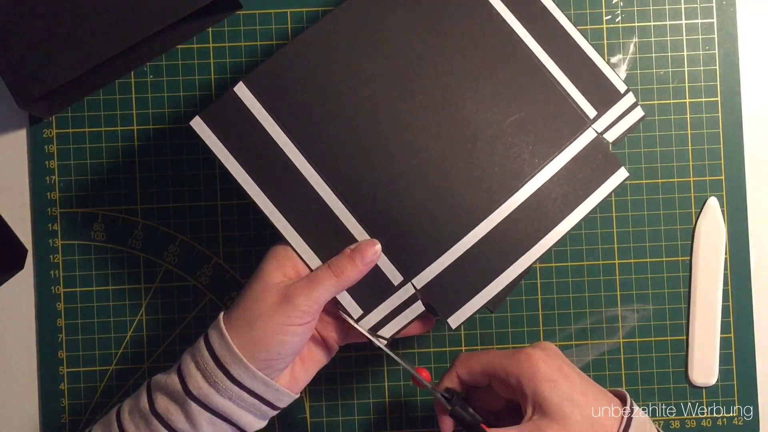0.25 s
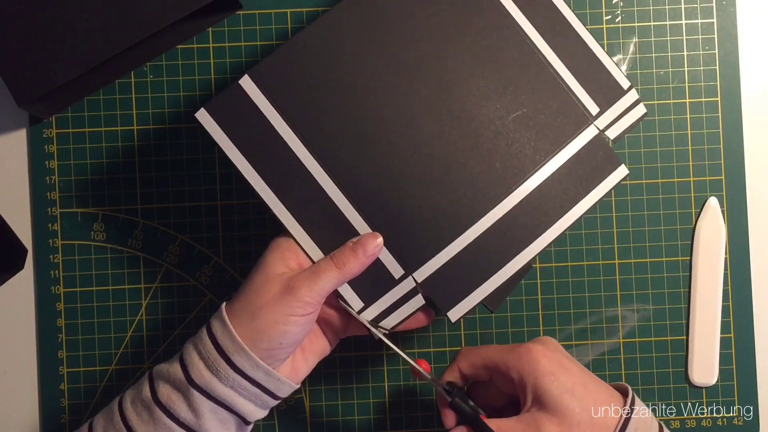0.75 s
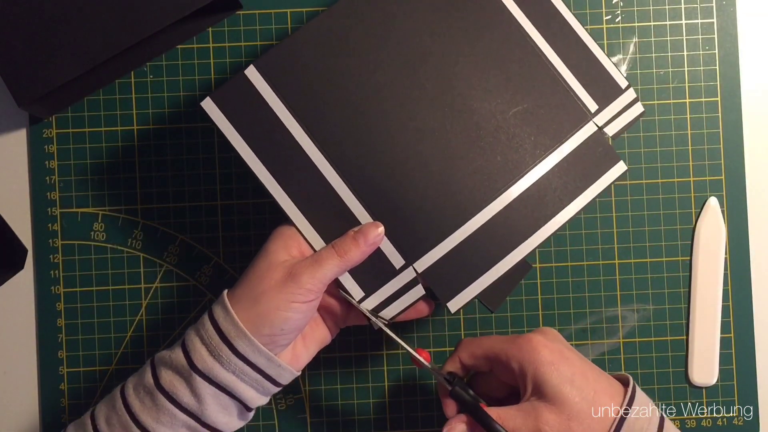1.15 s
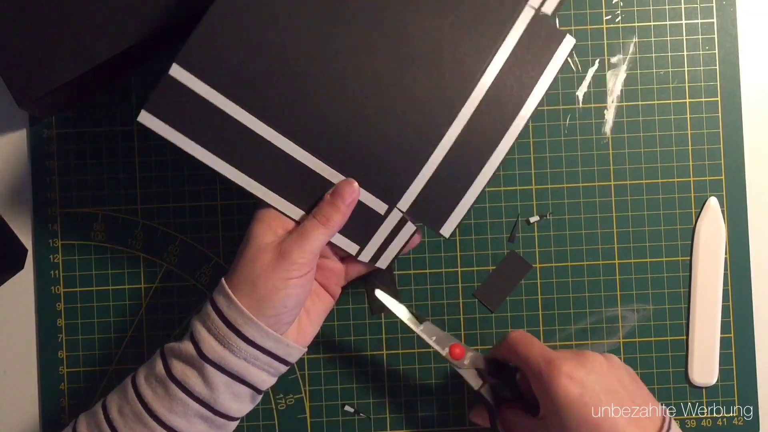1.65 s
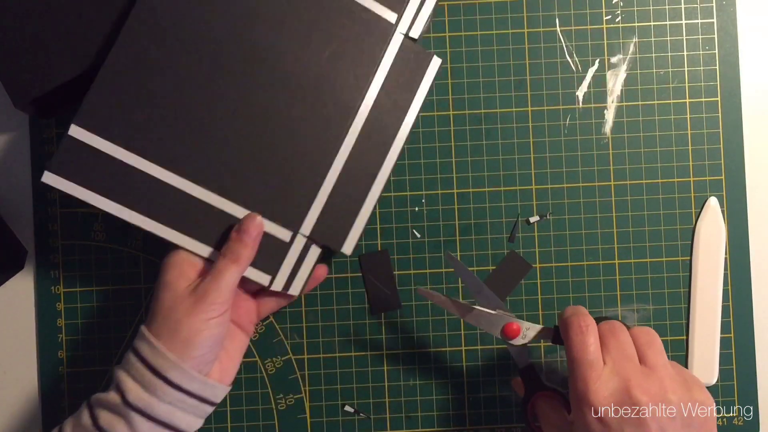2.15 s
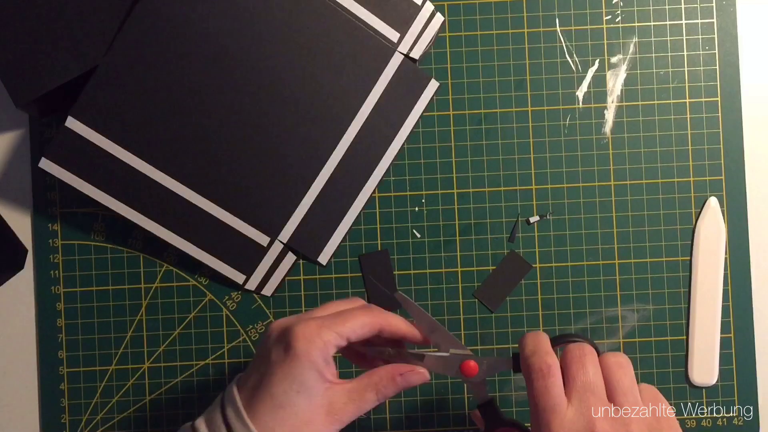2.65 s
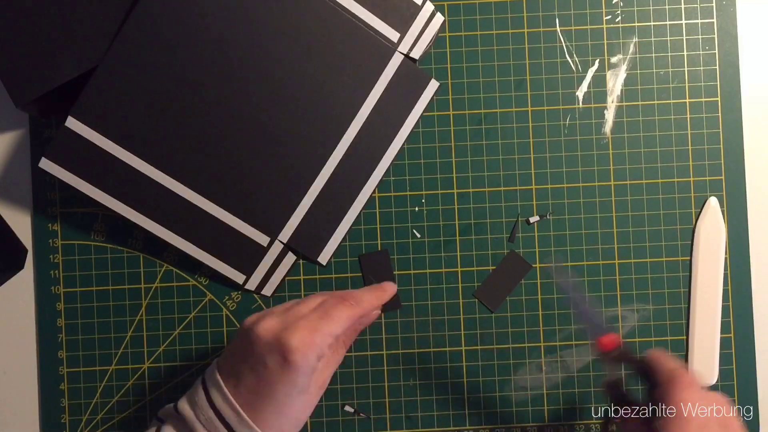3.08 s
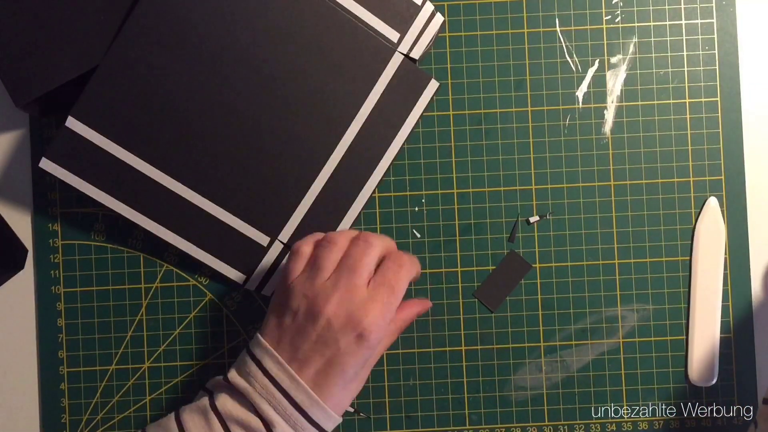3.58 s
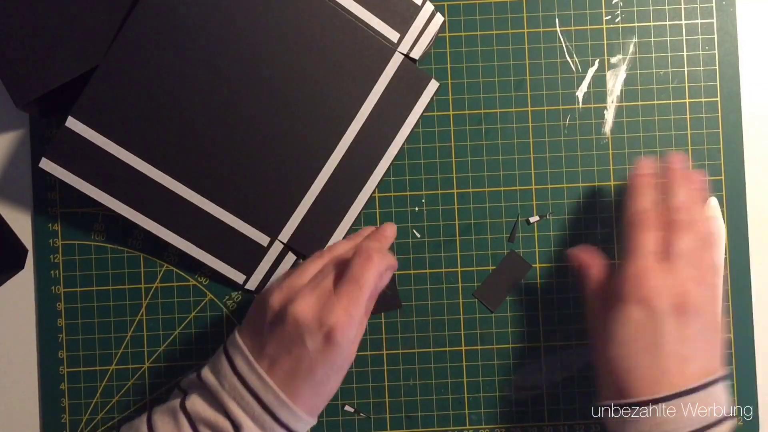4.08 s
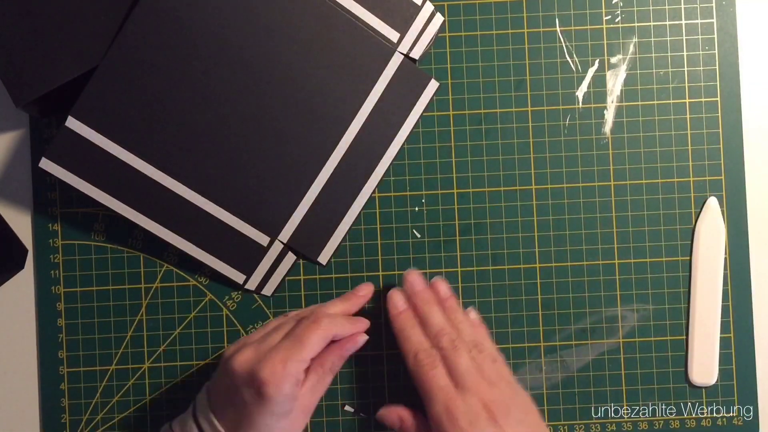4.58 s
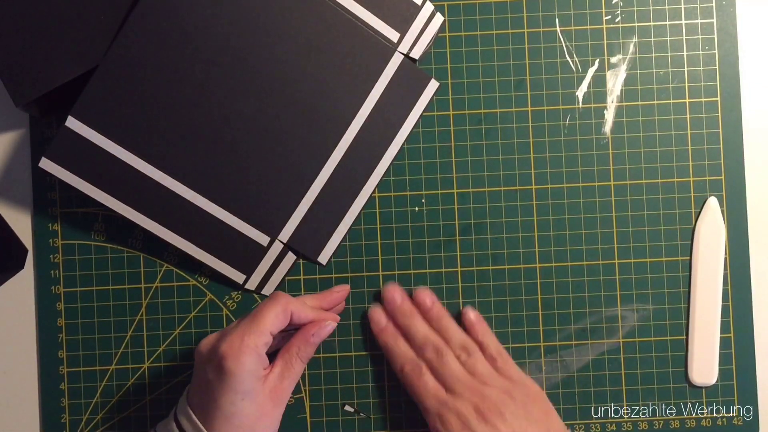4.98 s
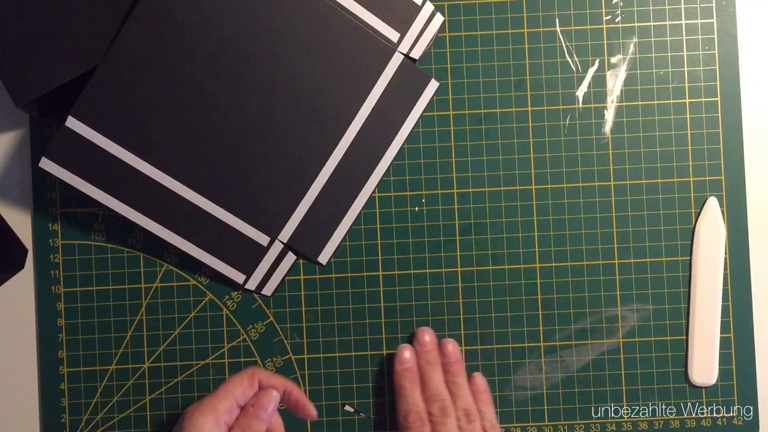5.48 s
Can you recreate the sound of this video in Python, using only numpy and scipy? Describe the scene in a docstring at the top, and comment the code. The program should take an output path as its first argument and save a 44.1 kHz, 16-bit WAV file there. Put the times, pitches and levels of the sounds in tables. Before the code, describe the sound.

Small scissors crunch and snap through stiff card, the card flops onto a mat, scissors clatter down, then hands thump and sweep scraps.

```python
"""Stiff card crunches twice under small scissors, which snap shut; the card drops on a cutting mat.
The blades close once more, the scissors clatter onto the table, hands thump and sweep the scraps away.
Cuts, blows and rubs are shaped bursts of noise; thumps are ringing modes of the table top.
A small room answers: desk reflections for small sounds under the microphone, the whole room for knocks.
Air noise and mains hum lie beneath."""
import sys
import numpy as np
from scipy import signal
from scipy.fft import rfft, irfft
from scipy.io import wavfile
from scipy.ndimage import uniform_filter1d

SR = 44100
rng = np.random.default_rng(int(sys.argv[2]) if len(sys.argv) > 2 else 0)


def to_wav(sig):
    """Store sig (one row per channel, or 1-D mono) as 16-bit WAV at the path in sys.argv[1].

    Samples outside -1..1 are clipped; the rate is SR.
    """
    pcm = np.clip(np.atleast_2d(sig), -1, 1) * 32767
    pcm = np.round(pcm).astype(np.int16)
    wavfile.write(sys.argv[1], SR, pcm.T)  # frames by channels


N = 252693
BURST = 8192  # samples in one short sound
T, HZ = np.arange(BURST) / SR, np.fft.rfftfreq(BURST, 1 / SR)
TIME, ALL_HZ = np.arange(N) / SR, np.fft.rfftfreq(N, 1 / SR)

# Levels of bites, blows and narrow-band touches are the rms of their loudest 3 ms, direct sound
# ahead of the recorder.
# The squeezes: each crunches through fibres until the card gives way.
# Each row: moment it gives in seconds, level in dB, half length in seconds, build-up in seconds.
BITES = [(.294, -56, 0.0033, 0.015), (.433, -62.5, .006, .05), (.468, -57.5, .006, .003),
         (.517, -49.5, .0036, 0.041), (0.598, -50.5, .0045, .004), (.629, -44.5, 0.0028, 0.019),
         (.71, -32.5, 0.0019, 0.0068), (0.729, -48, 0.0078, .003), (1.009, -47.5, 0.0075, .006),
         (1.172, -52, .005, 0.034), (1.314, -44.5, .0023, 0.014), (1.35, -30.5, 0.0041, 0.007)]
# How the held card rings in each cut. Each row: frequency in Hz, gain in dB.
FIRST_CUT_RING = [(200, -31), (520, -18.5), (720, -3.5), (900, 3.5), (1060, 1), (1300, -9), (1600, -28),
                  (1950, -10.5), (2350, -13), (2750, 8), (3250, -8.5), (3700, -16), (7000, -25.5),
                  (16000, -25)]
SECOND_CUT_RING = [(200, -18), (750, -20), (1050, 6.5), (1200, -1), (1400, 7.5), (1750, -11.5), (2400, -35),
                   (3100, -10), (3900, -23.5), (6000, -23), (8000, -44), (16000, -36)]
REGRIP_S = 0.9  # the card is gripped anew
GRIP_BEFORE, GRIP_AFTER = 0.16, 0.72  # share of the second ring before and after that
CRUNCH_DB, CRUNCH_ROUGH_DB = -3, 2  # the build-up: level re the bite, and how unevenly it swells
SLIP_S, SLIP_JITTER, STICK_DB = 0.01515, 0.16, -10.5  # slip interval, share its pace varies, level between slips

# Blows of six kinds, each with its spectrum: blades snapping through the last of the card,
# steel touching steel, blades landing on the table, handles dropping and the scissors' parts
# clacking together, light taps and flicks of card, fingers and hands, and card falling flat
# and settling on the mat.
# Each blow row: start in seconds, level in dB, contact in seconds, brightness in dB per octave.
# Each spectrum row: frequency in Hz, gain in dB.
SNAPS = [(.7092, -33, 0.0012, 0), (1.3567, -27, 0.0036, -1), (1.3595, -33, 0.0019, 2.5)]
SNAP_COLOUR = [(40, -40), (150, -48), (400, -0.5), (600, 1), (1050, 4), (1450, -10.5), (2300, -4.5),
               (2850, 0), (3400, -7.5), (5000, -16.5), (6200, -13), (8500, -26.5), (10500, -15),
               (16000, -31)]
BLADE_CLICKS = [(1.466, -63, 0.007, -2), (1.6022, -59.5, 0.0029, -5), (2.843, -62, 0.0062, 19),
                (3.035, -58, 0.0024, 3), (3.2247, -29.5, 0.0026, -4), (4.648, -63, .004, 36),
                (5.335, -69.5, 0.0021, 8)]
BLADE_COLOUR = [(300, -55), (850, -26), (1150, -0.5), (1700, -8.5), (2400, -11.5), (3500, -3), (4600, 6),
                (6200, -0.5), (9000, 6.5), (14000, 3), (16000, -7)]
STEEL_KNOCKS = [(3.8237, -20.5, 0.0038, -1)]
STEEL_COLOUR = [(40, -30), (110, -12), (500, -12), (720, -1), (980, -4), (1170, -12), (1400, 1), (1780, -2),
                (2100, -22), (2550, 0), (2850, -2), (3150, -15), (3700, -10), (4050, 1), (4400, -4),
                (4850, -22), (5700, -12), (9000, -21), (16000, -31)]
SCISSOR_CLACKS = [(3.957, -44.5, 0.016, -1), (3.9765, -16.5, 0.004, -1), (3.995, -23, 0.0058, -2.5),
                  (4.004, -26, 0.0088, -3), (4.0097, -33, .0033, 6), (4.0298, -24.5, 0.0029, 7.5)]
CLACK_COLOUR = [(40, -36), (110, -11.5), (250, -10.5), (400, -4.5), (600, 1.5), (1050, -1.5), (1450, -6),
                (1900, -12.5), (3000, -16.5), (4000, -26.5), (6000, -32.5), (9000, -45), (16000, -53.5)]
LIGHT_TAPS = [(1.464, -51.5, 0.008, -3.5), (1.526, -46.5, .0039, 3.5), (1.788, -57, 0.0057, -4),
              (1.8094, -43.5, 0.0034, -3.5), (1.823, -52, 0.0018, -5.5), (2.2145, -56.5, 0.041, -3.5),
              (3.505, -58, 0.013, 7), (3.5375, -52, .003, -1.5), (5.4262, -62.5, 0.0041, -4.5)]
LIGHT_TAP_COLOUR = [(40, -31.5), (320, -12.5), (600, -17), (1050, -4), (1450, 1.5), (1750, -9.5),
                    (2300, -12), (2950, -5.5), (3500, -10), (4000, -6), (5000, -21.5), (7000, -22.5),
                    (10000, -41), (16000, -48)]
CARD_TAPS = [(2.2563, -28.5, 0.0017, 1.5), (2.263, -37, 0.012, 1.5), (2.3452, -39, 0.0027, 4),
             (2.356, -41, 0.01, -4), (2.4727, -36, 0.005, 0.5), (2.4927, -36, 0.0068, 0.5)]
CARD_COLOUR = [(40, -43), (100, -22), (250, 2.5), (550, 4), (900, 1), (1090, -3), (1270, 3.5), (1650, -8),
               (1950, -6), (2400, -14.5), (3100, -16.5), (4200, -24), (6500, -32.5), (9000, -43),
               (16000, -48)]
MIN_CONTACT_S = 1e-4  # any shorter contact in a row counts as this
# What rings on after a blow. Each row: frequency in Hz, level re the blow in dB, t60 in seconds.
CARD_MODES = [(558, -10, 0.086), (1080, -6, 0.082), (1676, -5.5, 0.028)]
STEEL_MODES = [(725, -3, 0.039), (1370, -4, 0.016), (1565, -15, 0.028), (2685, -5, 0.035),
               (4245, -26, 0.023)]
# Flurries of small contacts. Each lists: start in seconds, length in seconds, first level in dB,
# change by the end in dB, contact in seconds, brightness in dB per octave.
CARD_TURNING = (1.895, 0.045, -56, 2, -0.05, -2.5)
CARD_SETTLING = (2.5, 0, -44, -1, -0.12, 3.5)
SCISSOR_RATTLE = (4.04, 0.035, -36, 0, .003, 2.5)
FLURRY_SPREAD_DB, FLURRY_SPREAD_TILT = 2.4, 1.5  # scatter of level (dB) and brightness (dB per octave)

# Rubbing strokes of steel on steel, card scuffing, and palms on the mat, each with its spectrum.
# Each stroke row: time of full pressure in seconds, level in dB, rise, hold and fall in seconds.
# Each spectrum row: frequency in Hz, gain in dB.
BLADE_SLIDES = [(1.906, -69.5, .018, .015, .03), (1.976, -58, .014, .008, 0.005), (3.0, -75, .03, .04, .03),
                (3.173, -56, .003, .002, .005), (3.194, -46.5, .009, .012, 0.01),
                (3.29, -61.5, .03, 0.009, .008)]  # levels before a trim in scene()
SLIDE_COLOUR = [(1000, -28), (3500, -14.5), (5500, -15.5), (6700, -8.5), (8200, -14), (10000, -8),
                (12800, -4.5), (16000, -13)]
CARD_SLIDES = [(1.372, -55, 0.0035, .015, 0.083), (1.895, -66, .03, 0.024, 0.13),
               (2.38, -50.5, .025, .025, 0.038), (3.54, -62, .035, .028, 0.011)]
SCUFF_COLOUR = [(200, 0.5), (600, 1), (1300, -1), (2200, -1), (3200, -6.5), (4300, -8), (6000, -18),
                (10000, -27), (16000, -30)]
SWEEPS = [(4.32, -69, 0.028, 0.068, .04), (4.455, -60.5, 0.049, 0.13, .085),
          (4.98, -58.5, .035, 0.018, .04), (5.1, -61, 0.044, .1, .025), (5.47, -65, 0.02, 0.31, .05),
          (5.6, -62, 0.018, 0.0089, .012)]
SWEEP_COLOUR = [(300, -1.5), (800, -2), (1600, 5), (2400, 3), (3300, 3.5), (4800, -1), (7000, 0), (9500, 0),
                (13000, -2), (16000, -7)]
# Brief narrow-band squeaks, finger taps and hand touches.
# Each row: centre in seconds, level in dB, half length in seconds, frequency in Hz, width in Hz.
SQUEAKS_AND_TOUCHES = [(1.855, -58.5, 0.017, 1650, 220), (2.078, -63, 0.065, 1660, 192),
                       (2.223, -53, 0.0073, 580, 110), (3.512, -49, 0.0037, 273, 91),
                       (4.975, -58.5, 0.026, 3140, 590), (5.195, -50.5, 0.0069, 3130, 450),
                       (5.601, -57, .008, 3600, 790), (5.723, -58.5, 0.02, 1980, 487)]

# Card and hands landing softly on the table. Each row: start in seconds, peak in dB, push in seconds.
THUMPS = [(2.257, -42, 0.0042), (2.299, -38.5, .003), (2.346, -34, 0.0015), (2.362, -35, 0.0019),
          (2.497, -44, .0041), (3.545, -45.5, 0.012), (4.297, -29.5, 0.0041), (4.906, -37.5, .0044),
          (5.429, -34.5, 0.0091)]
# The table top. Each row: frequency in Hz, level in dB, t60 in seconds.
TABLE_MODES = [(67.6, -13, 0.18), (105, -11, 0.099), (117.4, 7.5, 0.11), (211, -13.5, .12),
               (300, -12.5, 0.15)]
# Each knock of the scissors also pushes the table: peak re the knock, and length of the push.
STEEL_WEIGHT_DB, CLACK_WEIGHT_DB, KNOCK_PUSH_S = -19.5, -13, 0.0022

# Decay of the reflections close around the desk, and of the room. Each row: frequency in Hz, t60 in seconds.
DESK_T60 = [(150, 0.33), (1200, 0.31), (3000, 0.28), (8000, 0.34), (15000, 0.26)]
ROOM_T60 = [(120, 0.95), (500, 0.55), (1500, 0.68), (4000, 0.62), (8000, 0.43), (15000, 0.3)]
# Spectrum of the air noise. Each row: frequency in Hz, gain in dB.
AIR = [(20, -9), (40, -2), (62, 6), (90, 8.5), (150, -3), (220, -3.5), (330, -5), (500, -10.5),
       (900, -12.5), (1500, -13.5), (2400, -14), (4000, -16.5), (7000, -21), (10500, -24), (16000, -26)]
AIR_DB = -71.5  # rms above 300 Hz
HUM_HZ, HUM_DB = 100, -59
LOW_CUT_HZ, EDGE_HZ = 58, 16200  # microphone low cut, recorder band limit


def amp(db):
    """Decibels to gain."""
    return 10 ** (np.asarray(db) / 20)


def unit(x):
    """Scales to rms 1."""
    return x / np.sqrt(np.mean(x ** 2) + 1e-20)


def crest(x, size=130):
    """Scales so that the loudest three milliseconds have rms 1."""
    return x / np.sqrt(uniform_filter1d(x ** 2, size).max() + 1e-20)


def read(points, hz):
    """Reads a spectrum table on a log-frequency axis."""
    f, value = np.transpose(points)
    return np.interp(np.log(hz + 1), np.log(f + 1), value)


def add(mix, s, sound):
    """Mixes a sound in at a time."""
    part = mix[max(round(s * SR), 0):][:len(sound)]
    part += sound[:len(part)]


def wander(rate_hz):
    """Slow random motion of rms 1."""
    noise = rfft(rng.standard_normal(N))
    return unit(irfft(noise * np.exp(-(ALL_HZ / rate_hz) ** 2), N))


def decaying_modes(modes, t):
    """Sum of sine modes, each dying away by 60 dB in its t60."""
    return sum(amp(db - 60 * t / t60) * np.sin(2 * np.pi * hz * t) for hz, db, t60 in modes)


def ring(force, colour_db, size=61):
    """Evens out a burst of force and passes it through a causal body of the given colour."""
    spectrum = rfft(force)
    own_log = np.log(uniform_filter1d(abs(spectrum) ** 2, size) + 1e-12) / 2
    log_gain = np.log(amp(colour_db)) - own_log
    circle = np.concatenate([log_gain, log_gain[-2:0:-1]])
    # minimum phase: the body starts to sound with the force, not before
    body = np.exp(np.conj(signal.hilbert(circle)))[:len(spectrum)]
    return crest(irfft(spectrum * body))


def cutting(grain_db):
    """The blades stick and slip ever harder, then break one dense clump of fibres; the card radiates it."""
    out = np.zeros(N)
    t = T - T[-1] / 2  # zero where the card gives
    pace = wander(60)
    swell = amp(CRUNCH_DB + CRUNCH_ROUGH_DB * wander(60))
    first_ring, second_ring = read(FIRST_CUT_RING, HZ), read(SECOND_CUT_RING, HZ)
    for s, db, half, build in BITES:
        noise, sizes = rng.standard_normal((2, BURST))
        slips = np.cumsum(1 + SLIP_JITTER * np.interp(s + t, TIME, pace)) / (SR * SLIP_S)
        stutter = amp(STICK_DB * np.sin(np.pi * (slips - slips[BURST // 2])) ** 2)
        crunch = stutter * np.interp(s + t, TIME, swell) * np.exp(-abs(t) / build) * (t < 0)
        give = np.exp(-0.5 * (t / half) ** 2)
        force = noise * amp(grain_db * sizes) * np.maximum(crunch, give)
        grip = GRIP_BEFORE if s < REGRIP_S else GRIP_AFTER
        add(out, s + t[0], amp(db) * ring(force, (1 - grip) * first_ring + grip * second_ring))
    return out


def strikes(rows, colour, tick, hold, grain_db, modes=()):
    """Each blow is a sharp first touch and a cluster of uneven tiny contacts; a few modes ring on."""
    out = np.zeros(N)
    octaves = np.log2(np.maximum(HZ, 200) / 1000)  # brightness pivots at 1 kHz
    tones = decaying_modes(modes, T)
    for s, db, contact, bright in rows:
        noise, sizes = rng.standard_normal((2, BURST))
        contact = max(contact, MIN_CONTACT_S)
        force = unit(noise * amp(grain_db * sizes)) * np.exp(-(T / contact) ** hold)
        force[0] = tick
        blow = ring(force, read(colour, HZ) + bright * octaves)
        swell = 1 - np.exp(-2 * T / contact)  # the modes swell during contact
        add(out, s, amp(db) * crest(blow + tones * swell))
    return out


def flurry(start, length, db, change_db, contact, bright, count):
    """Rows for small, differing blows spread unevenly over the length, or all at once if it is zero."""
    late = (np.arange(count) + rng.random(count)) / count
    rows = []
    for u in late:
        size, tilt = rng.standard_normal(2)
        level = db + change_db * u + FLURRY_SPREAD_DB * size
        rows.append((start + length * u, level, contact, bright + FLURRY_SPREAD_TILT * tilt))
    return rows


def stroke(s, db, rise, hold, fall):
    """Pressure of one stroke: an exponential swell, a hold and an exponential release."""
    before = np.minimum(TIME - s, 0)
    after = np.maximum(TIME - s - hold, 0)
    return amp(db) * np.exp(before / rise - after / fall)


def rubbing(strokes, colour, grain_db, flutter_db, patchy_db):
    """Countless small slips under a fluttering pressure; the colour shifts as the contact moves on."""
    pressure = sum(stroke(*row) for row in strokes)
    grains = np.repeat(rng.standard_normal(N), repeats=8)[:N]  # each grain lasts 8 samples
    slips = rng.standard_normal(N) * amp(grain_db * grains)
    hz, _, z = signal.stft(slips, SR, nperseg=512)
    patches = uniform_filter1d(rng.standard_normal(z.shape), size=6, axis=0)
    patches = unit(uniform_filter1d(patches, size=9, axis=1))
    gain = amp(read(colour, hz)[:, None] + patchy_db * patches)
    hiss = signal.istft(z * gain, SR, nperseg=512)[1][:N]
    return pressure * unit(hiss * amp(flutter_db * wander(74)))


def squeaks_and_touches():
    """Noise feeds one narrow resonance for a moment."""
    out = np.zeros(N)
    for s, db, half, hz, width in SQUEAKS_AND_TOUCHES:
        resonance = 1 / (1 + (2 * (ALL_HZ - hz) / width) ** 4)
        tone = irfft(rfft(rng.standard_normal(N)) * resonance, N)
        out += amp(db) * crest(tone * np.exp(-0.5 * ((TIME - s) / half) ** 2))
    return out


def table_thumps():
    """A soft push sets the low modes of the table top swinging."""
    out = np.zeros(N)
    top = decaying_modes(TABLE_MODES, np.arange(SR // 2) / SR)
    knocks = [(s, db + STEEL_WEIGHT_DB, KNOCK_PUSH_S) for s, db, _, _ in STEEL_KNOCKS]
    knocks += [(s, db + CLACK_WEIGHT_DB, KNOCK_PUSH_S) for s, db, _, _ in SCISSOR_CLACKS]
    for s, db, push in list(THUMPS) + knocks:
        force = np.sin(np.pi * np.minimum(T / push, 1)) ** 2
        swing = signal.fftconvolve(force, top)
        add(out, s, -amp(db) * swing / abs(swing).max())
    return out


def room(x, t60, build_s, treble_db):
    """Dense reflections build up within milliseconds and die band by band."""
    hz, t, z = signal.stft(rng.standard_normal(SR), SR, nperseg=256)
    treble = read([(2000, 0), (14000, treble_db)], hz)[:, None]
    z = z * amp(treble - 60 * t / read(t60, hz)[:, None])
    tail = signal.istft(z, SR, nperseg=256)[1][:SR]
    tail = tail * (1 - np.exp(-(TIME[:SR] / build_s) ** 2))
    mids = abs(rfft(tail))[300:3000]  # one bin per Hz: unit gain over 300 to 3000 Hz
    return signal.fftconvolve(x, tail / np.sqrt(np.mean(mids ** 2)))[:N]


def background(waver_db):
    """Steady air noise and a slightly wavering mains hum."""
    z = rfft(rng.standard_normal(N)) * amp(read(AIR, ALL_HZ))
    air = irfft(z, N) / np.std(irfft(z * (ALL_HZ > 300), N))
    hum = np.sqrt(2) * np.sin(2 * np.pi * HUM_HZ * TIME) * amp(waver_db * wander(6.2))
    return amp(AIR_DB) * air + amp(HUM_DB) * hum


def scene():
    """Cuts, blades and sweeps stir only the nearby reflections; card, light taps and table fill the room."""
    cuts = cutting(grain_db=6.0)
    cuts += strikes(SNAPS, SNAP_COLOUR, tick=2.3, hold=0.91, grain_db=4)
    blades = strikes(BLADE_CLICKS, BLADE_COLOUR, tick=1.5, hold=1.7, grain_db=0.5)
    blades += amp(-0.5) * rubbing(BLADE_SLIDES, SLIDE_COLOUR, grain_db=3, flutter_db=1.5, patchy_db=3)

    light_taps = list(LIGHT_TAPS) + flurry(*CARD_TURNING, count=2)
    card_taps = list(CARD_TAPS) + flurry(*CARD_SETTLING, count=3)
    card_and_taps = strikes(light_taps, LIGHT_TAP_COLOUR, tick=1.4, hold=0.73, grain_db=6.5)
    card_and_taps += strikes(card_taps, CARD_COLOUR, tick=1.5, hold=0.73, grain_db=4.5, modes=CARD_MODES)
    card_and_taps += rubbing(CARD_SLIDES, SCUFF_COLOUR, grain_db=4.5, flutter_db=1.2, patchy_db=4.5)

    clacks = list(SCISSOR_CLACKS) + flurry(*SCISSOR_RATTLE, count=2)
    clatter = strikes(STEEL_KNOCKS, STEEL_COLOUR, tick=0.76, hold=2.9, grain_db=0.5, modes=STEEL_MODES)
    clatter += strikes(clacks, CLACK_COLOUR, tick=2.9, hold=1.18, grain_db=5.5)
    sweeps = rubbing(SWEEPS, SWEEP_COLOUR, grain_db=1.5, flutter_db=0.7, patchy_db=2.5)
    sweeps += squeaks_and_touches()
    thumps = table_thumps()

    to_desk = amp(-12.5) * cuts + amp(-10.0) * blades + amp(-10.0) * sweeps
    to_room = amp(-11) * card_and_taps + amp(-5) * clatter + amp(-11.5) * thumps
    near = room(to_desk, DESK_T60, build_s=0.0032, treble_db=-6.0)
    far = room(to_room, ROOM_T60, build_s=0.0065, treble_db=-4.0)
    direct = cuts + blades + card_and_taps + sweeps + clatter + thumps
    return (direct + near + far + background(waver_db=1.64))[None]


def record(dry):
    """The microphone's low cut and the recorder's band limit."""
    low_cut = signal.butter(N=3, Wn=LOW_CUT_HZ, btype="high", fs=SR, output="sos")
    band_limit = signal.firwin(401, EDGE_HZ, window=("kaiser", 8), fs=SR)
    return signal.oaconvolve(signal.sosfilt(low_cut, dry), band_limit[None], "same")


dry = scene()
out = record(dry)
to_wav(out)
```